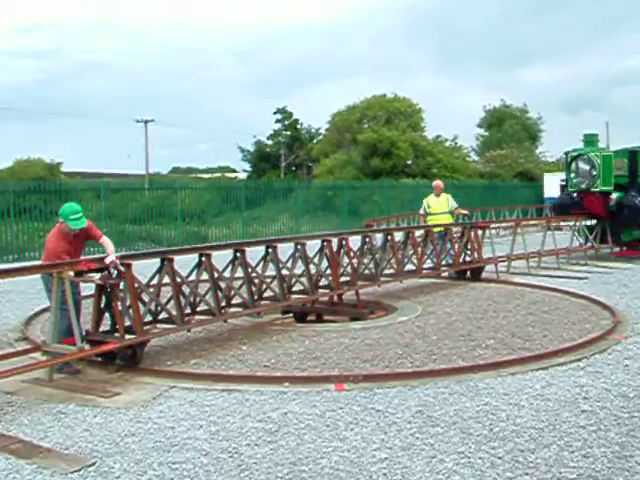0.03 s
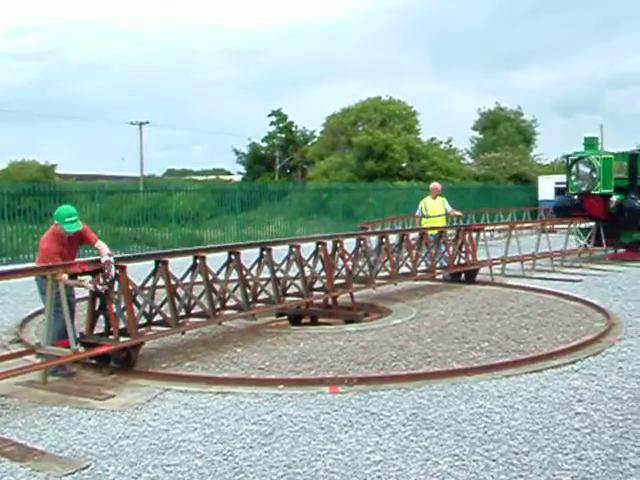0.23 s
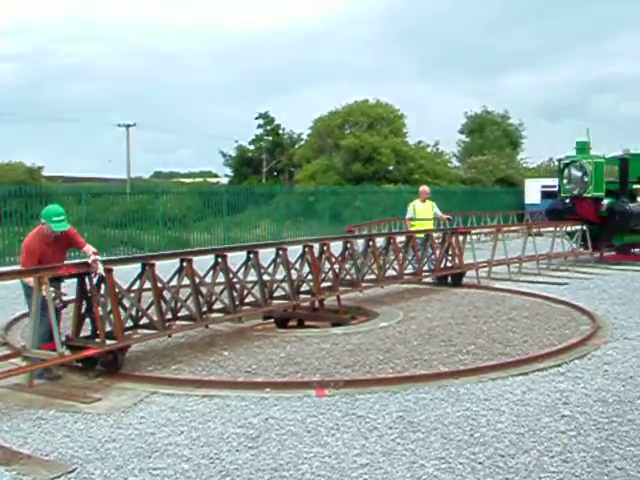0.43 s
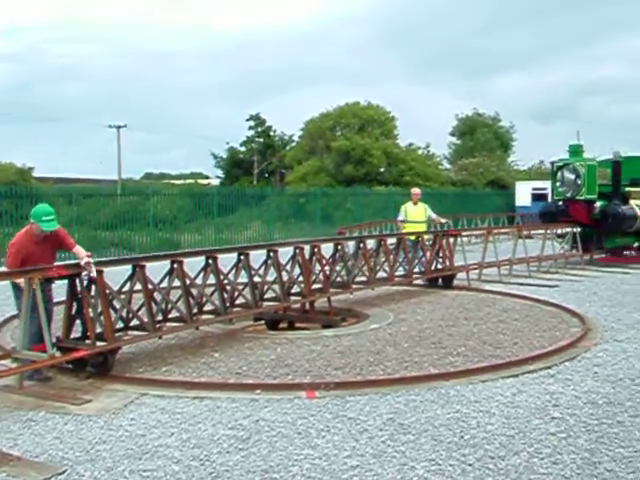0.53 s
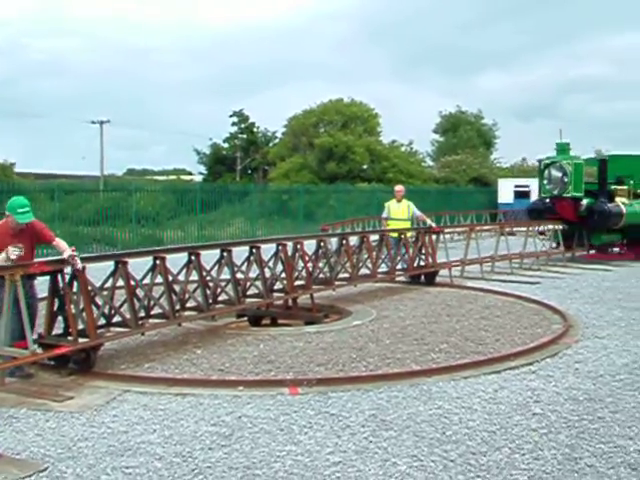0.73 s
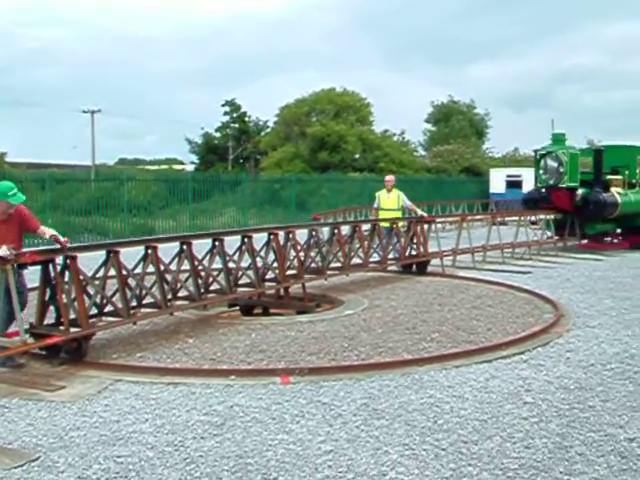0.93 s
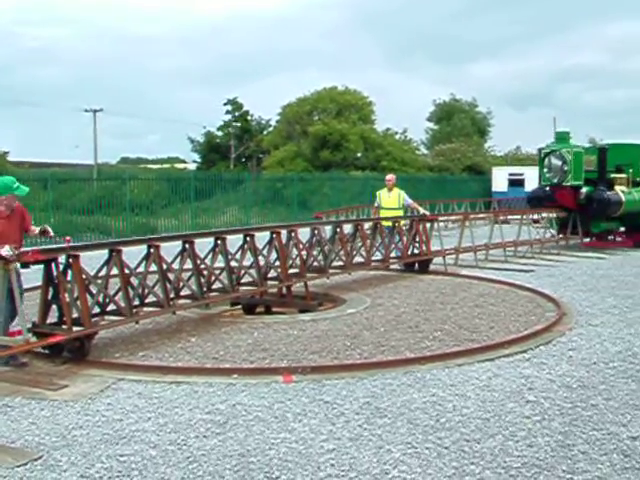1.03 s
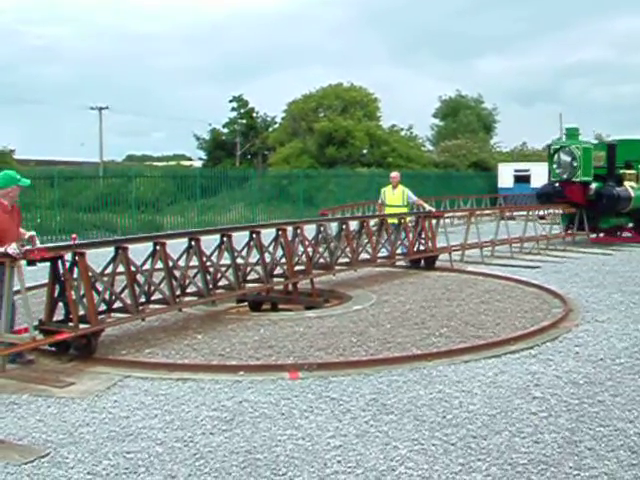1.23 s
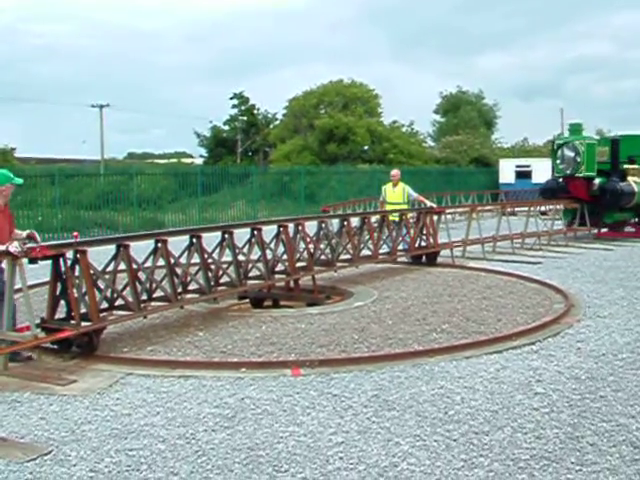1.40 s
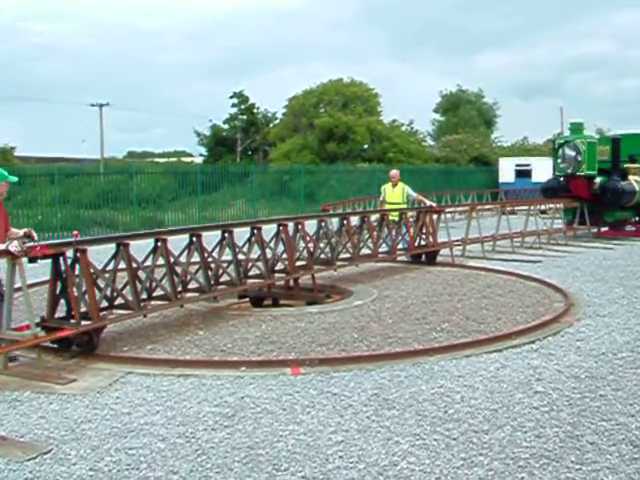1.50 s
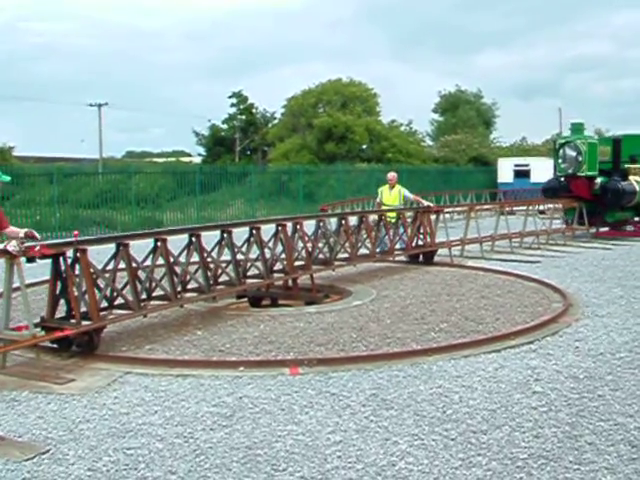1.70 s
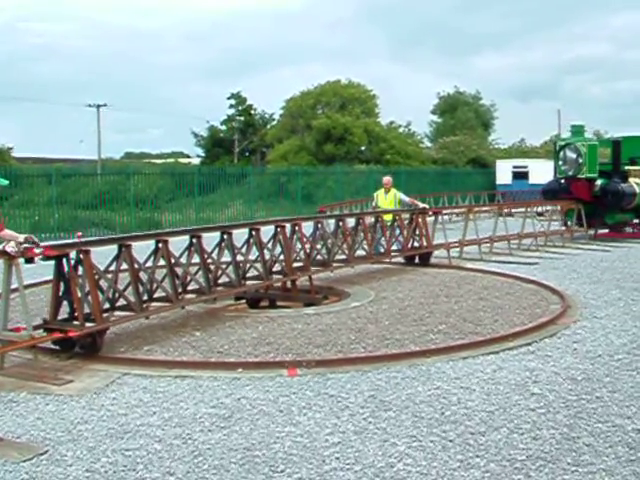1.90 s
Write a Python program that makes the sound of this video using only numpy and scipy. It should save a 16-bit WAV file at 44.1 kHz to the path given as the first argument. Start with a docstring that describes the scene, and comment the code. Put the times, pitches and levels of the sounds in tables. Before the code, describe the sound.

Two steel clanks sound from a railway turntable rolling outdoors. A low wheel rumble leads to a thud and a loud, stumbling clank at about 0.2 seconds. A brighter clank follows at 0.7 seconds, ringing briefly. From about 1.4 seconds the rumble and a low hum slowly build, with three small grit ticks between 1.2 and 1.7. A light breeze, a faint sinking tone and a thin motor whine lie behind.

```python
"""On an open gravel yard, a steel lattice turntable is pushed round by hand.
Its wheel rumbles along the ring rail and drops into a joint with a thud and a stumbling clank.
A second, brighter clank follows, and the girder rings on. The rumble slowly returns as grit ticks
under the wheel. Behind it are a faint sinking tone, a light breeze and a camera motor's thin whine."""
import sys
import numpy as np
from scipy import signal
from scipy.io import wavfile

SR = 44100
rng = np.random.default_rng(int(sys.argv[2]) if len(sys.argv) > 2 else 0)


def persist_wave(psi):
    """Save psi, clipped to +-1, as 16-bit WAV."""
    counts = np.round(np.clip(psi, -1, 1) * 32767).astype(np.int16)
    wavfile.write(sys.argv[1], SR, np.atleast_2d(counts).T)


N = 85995
TIME = np.arange(N) / SR

# Blows of steel on steel. Each row: start in seconds, ring level in dB, crack level in dB,
# spot struck (0 or 1), treble limit in Hz (higher for a harder blow).
STEEL_BLOWS = [(0.2239, -21, -15, 0, 3000), (0.2319, -22.5, -11, 0, 6970), (0.2366, -11.5, -7, 0, 8800),
               (0.2400, -22, -9.5, 0, 9000), (0.254, -25, -13.5, 0, 3200), (0.6766, -15.5, -12.5, 1, 12000),
               (0.7002, -31, -23, 1, 3500)]
# The crack of the contact. Each row: pitch in Hz, relative dB at spot 0, relative dB at spot 1.
CRACK_COLOUR = [(100, -32.5, -32), (305, -33.5, -20), (703, -19, -14.5), (1290, -6, -13), (1730, 2.5, 0),
                (2135, 7.5, 7.5), (2580, -6, -24), (3050, -9.5, -5), (3750, -4.5, -20), (4350, -11, -0.5),
                (4950, -2.5, -14), (5160, -7, -1), (5650, -22.5, -17), (7165, 2, 2.5), (7440, -20, -18),
                (8250, -30, -31)]
# The lattice's crowd of weak notes. Each row: pitch in Hz, relative dB at spot 0, relative dB at spot 1.
LATTICE_COLOUR = [(204, -47, -36), (427, -19, -13.5), (864, -17.5, -15), (970, -11, -8), (1400, -6.5, -5.5),
                  (2010, -2, -2), (2640, -2.5, 0.5), (2800, -15, -0.5), (3170, -7, 0), (3430, -8.5, -9.5),
                  (4400, -10, -9.5), (5440, -8.5, -7), (6460, -17.5, -12), (7000, 8, -7),
                  (7530, -36.5, -16), (8500, -34, -36)]
# How long the lattice rings. Each row: pitch in Hz, seconds to fade by 60 dB.
LATTICE_FADES = [(300, 1.9), (1100, 1.3), (2000, 0.81), (3000, 0.55), (5000, 0.49), (8000, .4)]


def clanks(crack_fade_s=0.049, lattice_db=-6):
    """Each blow cracks, then sets the girder and the lattice ringing. Softer blows sound duller."""
    out = np.zeros(N)
    band_fades = np.array([struck_fade(fade_s) for fade_s in at_hz(LATTICE_FADES, BAND_CENTRES_HZ)])
    for start_s, ring_db, crack_db, spot, treble_hz in STEEL_BLOWS:
        column = 1 + spot
        crack = noise_bands(CRACK_COLOUR, column).sum(axis=0) * struck_fade(crack_fade_s)
        girder = girder_ring(column)
        lattice = (noise_bands(LATTICE_COLOUR, column) * band_fades).sum(axis=0)
        ring = girder + from_db(lattice_db) * lattice
        blow = from_db(crack_db) * crack + from_db(ring_db) * ring
        treble_cut = signal.butter(2, treble_hz, fs=SR, output="sos")
        out += starting_at(start_s, signal.sosfilt(treble_cut, blow))
    return out


# The girder's strongest notes. Each row: pitch in Hz, level in dB when struck at spot 0,
# level in dB when struck at spot 1, seconds to fade by 60 dB.
GIRDER_NOTES = [(922, -26.5, -28, 1), (1028, -14, -24.5, 0.66), (1173, -15, -18, 0.61),
                (1246, -24, -20.5, 0.93), (1336, -22.5, -31, 0.99), (1360, -25, -23, 0.6),
                (1574, -18.5, -27.5, 0.76), (1650, -19.5, -17, 0.63), (1698, -12.5, -22.5, .7),
                (1788, -17, -25, 1), (1940, -25, -31, 0.49), (1970, -10.5, -21, 0.38), (2065, -2, 0, 0.12),
                (2137, -10.5, -10.5, 0.57), (2203, -12.5, -15, 0.17), (2323, -22.5, -26, 0.62),
                (2420, -17.5, -31, .5), (2607, -18, -12, .43), (3004, -18, -10, 0.37),
                (3260, -28, -15.5, 0.51), (4010, -31.5, -29, 0.53), (4100, -22.5, -23.5, 0.56),
                (4450, -18, -31, 0.49), (5160, -23.5, -35, 0.37), (5160, -31, -30, .4),
                (5580, -18.5, -12, .22), (5750, -30, -23, 0.56), (6530, -19.5, -33, 0.19),
                (6730, -26, -11, .12)]


def girder_ring(column, twin_gap_hz=8, twin_gain=0.4):
    """Similar struts ring at nearly the same pitch, so each note throbs against a weaker twin."""
    out = np.zeros(N)
    for note in GIRDER_NOTES:
        hz, db, fade_s = note[0], note[column], note[-1]
        phase, twin_phase = rng.uniform(0, 2 * np.pi, 2)
        twin_hz = hz + twin_gap_hz * rng.choice([-1, 1]) * (.5 + rng.random())
        tone = np.sin(2 * np.pi * hz * TIME + phase)
        twin = np.sin(2 * np.pi * twin_hz * TIME + twin_phase)
        out += from_db(db) * (tone + twin_gain * twin) * struck_fade(fade_s)
    return out


# The dull knock in the joint. Each row: pitch in Hz, relative level in dB.
THUD_COLOUR = [(40, -10), (120, -11), (230, 1.5), (400, -14), (650, 7.5), (1000, -6), (1500, -14),
               (4000, -34)]


def thud(start_s=0.232, level_db=-22, fade_s=0.069):
    """The wheel's weight lands in the joint with a short, dull burst of noise."""
    knock = noise_bands(THUD_COLOUR).sum(axis=0) * struck_fade(fade_s)
    return from_db(level_db) * starting_at(start_s, knock)


# How loud the wheel rumbles. Each row: time in seconds, level in dB.
RUMBLE_LEVELS = [(0, -36.5), (.08, -37), (.2, -37.5), (.243, -31), (.256, -56), (.8, -53.5), (1.0, -51.5),
                 (1.35, -55), (1.6, -48.5), (1.8, -44.5), (1.95, -44.5)]
# The rumble's deep sound. Each row: pitch in Hz, relative level in dB.
RUMBLE_COLOUR = [(25, -11), (39, 6.5), (50, -12), (72, -2.5), (140, -5), (210, -2), (340, -7.5), (450, -11),
                 (700, -16), (1000, -14.5), (1600, -18), (2800, -26), (7000, -49)]
# How loud the girder hums. Each row: time in seconds, level in dB.
HUM_LEVELS = [(0, -66), (.08, -40), (.15, -43.5), (.27, -64), (1.1, -60.5), (1.45, -54), (1.7, -50.5),
              (1.95, -43)]


def rolling(hum_hz=72, rise_hz_per_s=2, pitch_waver=0.019):
    """The wheel rumbles on the rough rail and sets the girder humming."""
    rumble_db = in_time(RUMBLE_LEVELS) + 0.9 * drift(23)
    rumble = from_db(rumble_db) * noise_bands(RUMBLE_COLOUR).sum(axis=0)
    hz = (hum_hz + rise_hz_per_s * TIME) * (1 + pitch_waver * drift(7.5))
    hum_db = in_time(HUM_LEVELS) + 0.61 * drift(5)
    return rumble + from_db(hum_db) * gliding_tone(hz)


# Stones under the wheel. Each row: start in seconds, level in dB, pitch in Hz.
GRIT_TICKS = [(1.160, -42, 1380), (1.4958, -39, 1290), (1.700, -38.5, 4750)]


def grit(fade_s=0.035, band_ratio=1.032):
    """Small stones tick under the wheel, each a burst of noise close to one pitch."""
    out = np.zeros(N)
    for start_s, db, hz in GRIT_TICKS:
        narrow_band = signal.butter(1, [hz / band_ratio, hz * band_ratio], "band", fs=SR, output="sos")
        noise = unit_level(signal.sosfilt(narrow_band, rng.standard_normal(N)))
        out += from_db(db) * starting_at(start_s, noise * struck_fade(fade_s))
    return out


# How loud the sinking tone is. Each row: time in seconds, level in dB.
SINKING_LEVELS = [(.3, -60.5), (.58, -58), (.68, -52.5), (.97, -55.5), (1.1, -57), (1.4, -64), (1.95, -74)]


def sinking_tone(start_hz=278, floor_hz=169.2, sink_s=0.73, pitch_waver=0.015):
    """A faint low tone slides down, swelling at the second clank and then fading."""
    hz = floor_hz + (start_hz - floor_hz) * np.exp(-TIME / sink_s)
    hz *= 1 + pitch_waver * drift(10)
    return from_db(in_time(SINKING_LEVELS)) * gliding_tone(hz)


# The hiss of the breeze. Each row: pitch in Hz, relative level in dB.
BREEZE_COLOUR = [(25, -20), (80, -4.5), (190, 0.5), (350, 0.5), (600, -0.5), (900, -1.5), (1400, -1.5),
                 (2200, -6), (3200, -7.5), (4500, -8), (6000, -9), (7300, -11), (8000, -27.5), (8800, -50)]


def breeze(level_db=-46.5, stir_db=1.6):
    """Moving air hisses, each band of pitch swelling and easing a little on its own."""
    bands = noise_bands(BREEZE_COLOUR)
    return from_db(level_db) * sum(band * from_db(stir_db * drift(6)) for band in bands)


# The tones of the camera's motor. Each row: pitch in Hz, level in dB.
MOTOR_TONES = [(1465, -61), (3025, -66), (3510, -64), (3709, -65.5), (4290, -67), (5065, -66), (6535, -66),
               (6735, -69), (7220, -57.5)]


def motor_whine(waver_hz=2.24):
    """A small motor spins with thin, slightly unsteady tones."""
    return sum(from_db(db) * gliding_tone(hz + waver_hz * drift(10.4)) for hz, db in MOTOR_TONES)


def from_db(db):
    """Turn decibels into a number to multiply by."""
    return 10 ** (np.asarray(db) / 20)


def unit_level(x):
    """Scale a signal so its average strength (rms) is 1."""
    return x / np.sqrt(np.mean(x ** 2) + 1e-20)


def in_time(rows):
    """Join (seconds, value) points with straight lines."""
    return np.interp(TIME, *np.transpose(rows))


def at_hz(rows, hz, column=1):
    """Read a table's column at any pitch, blending between rows."""
    table = np.array(rows)
    return np.interp(np.log(hz), np.log(table[:, 0]), table[:, column])


def drift(rate_hz):
    """A smooth random wobble of size about 1; a higher rate wobbles faster."""
    step, warm_up = 40, 2000  # one value every 40 samples; skip the first values
    memory = np.exp(-2 * np.pi * step * rate_hz / SR)
    noise = rng.standard_normal(N // step + warm_up + 2)
    slow = signal.lfilter([1], [1, -2 * memory, memory * memory], noise)[warm_up:]
    return np.interp(np.arange(N) / step, np.arange(len(slow)), unit_level(slow))


BAND_EDGES_HZ = np.concatenate([np.geomspace(22, 800, 14)[:-1], np.geomspace(800, 9400, 25)])
BAND_CENTRES_HZ = np.sqrt(BAND_EDGES_HZ[:-1] * BAND_EDGES_HZ[1:])
BAND_FILTERS = [signal.butter(2, edges, "band", fs=SR, output="sos")
                for edges in zip(BAND_EDGES_HZ, BAND_EDGES_HZ[1:])]


def noise_bands(colour, column=1):
    """Noise in bands from low to high, balanced by a colour table; their sum has strength 1."""
    white = rng.standard_normal((2, N + SR // 4))
    bands = np.array([signal.sosfilt(sos, white[k % 2])[-N:] for k, sos in enumerate(BAND_FILTERS)])
    bands *= from_db(at_hz(colour, BAND_CENTRES_HZ, column))[:, None]
    return bands / bands.sum(axis=0).std()


def struck_fade(fade_s, rise_s=0.00084):
    """The loudness of something struck: a quick rise, then 60 dB down in fade_s seconds."""
    return (1 - np.exp(-TIME / rise_s)) * np.exp(-np.log(1000) * TIME / fade_s)


def gliding_tone(hz):
    """A pure tone of strength 1 that follows a changing pitch."""
    return np.sqrt(2) * np.sin(2 * np.pi * np.cumsum(hz) / SR)


def starting_at(start_s, x):
    """Delay a sound to its moment."""
    return np.concatenate([np.zeros(int(start_s * SR)), x])[:N]


def scene():
    """Add all the sources into one channel."""
    return (clanks() + thud() + grit() + rolling() + sinking_tone() + breeze() + motor_whine())[None]


def record(dry, ceiling=0.96, treble_hz=8780):
    """Round off the loudest peaks, then cut the highest treble."""
    rounded = ceiling * np.tanh(dry / ceiling)
    treble_cut = signal.ellip(10, .2, 80, treble_hz, fs=SR, output="sos")
    return signal.sosfilt(treble_cut, rounded, axis=-1)


dry = scene()
out = record(dry)
persist_wave(out)
```